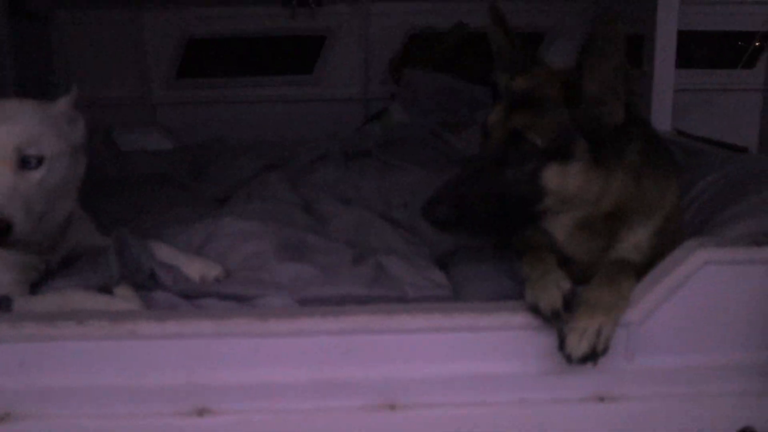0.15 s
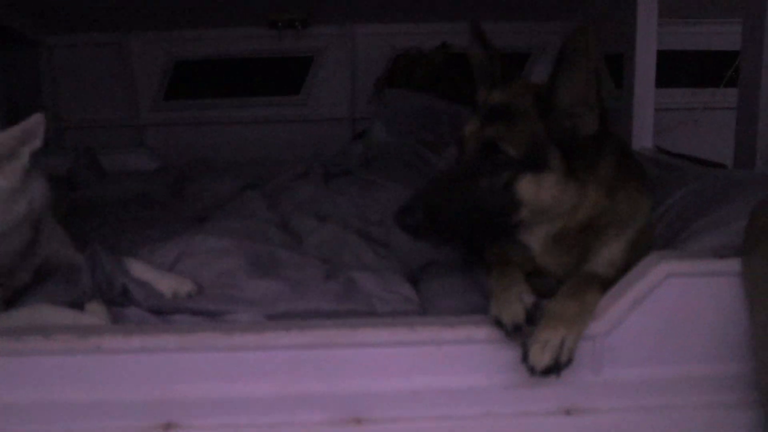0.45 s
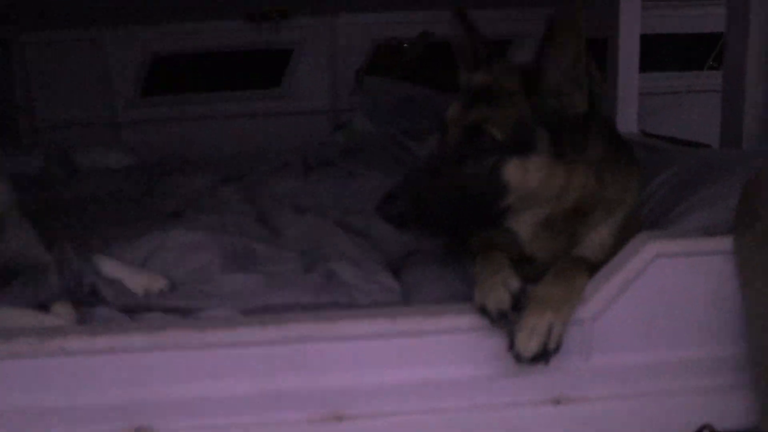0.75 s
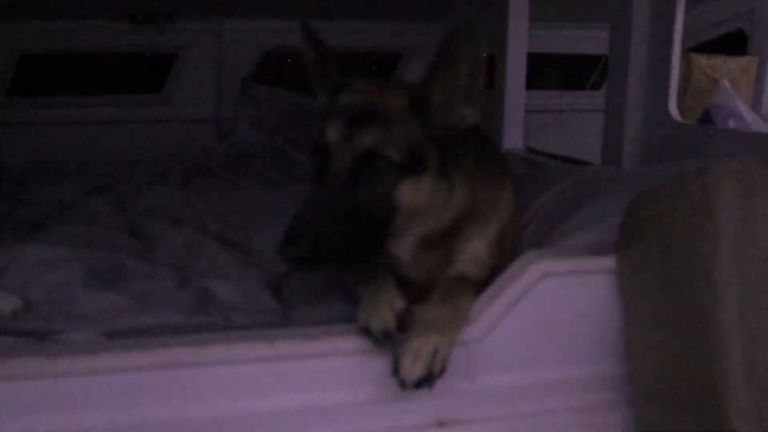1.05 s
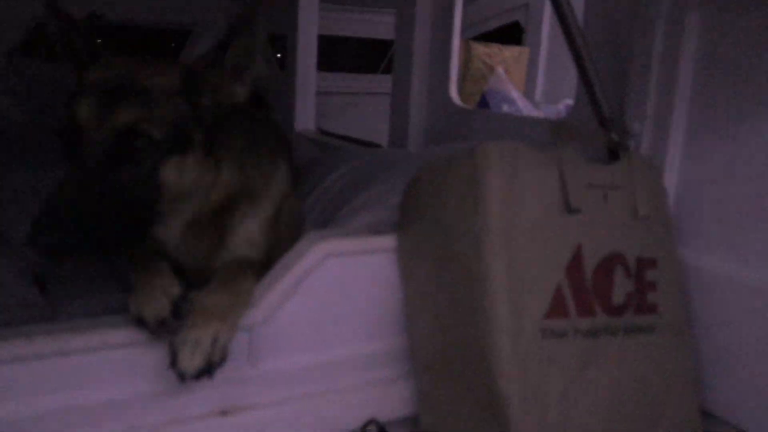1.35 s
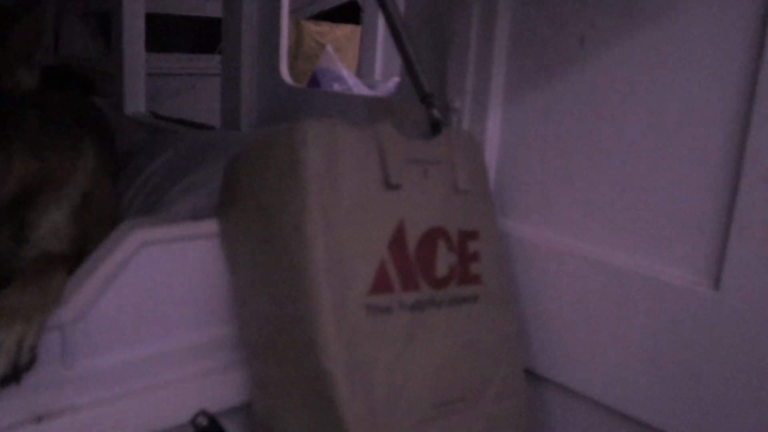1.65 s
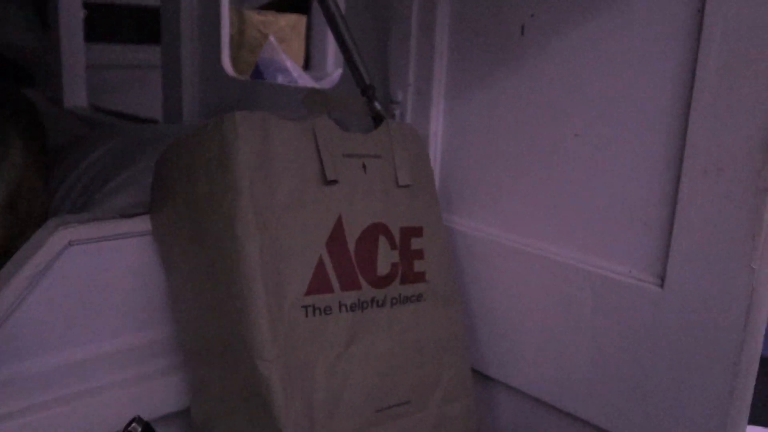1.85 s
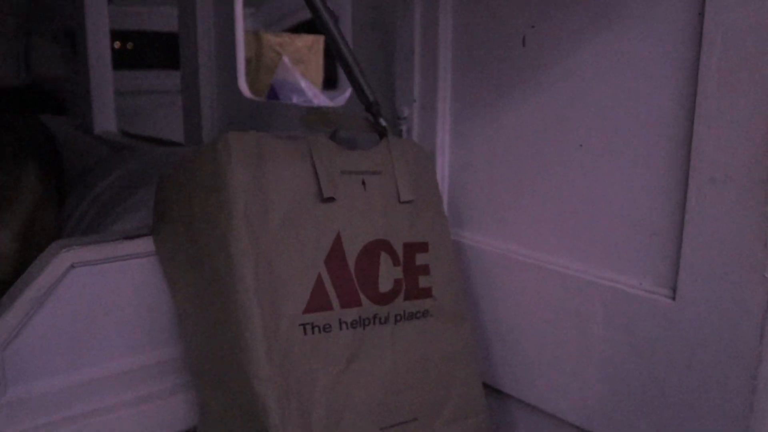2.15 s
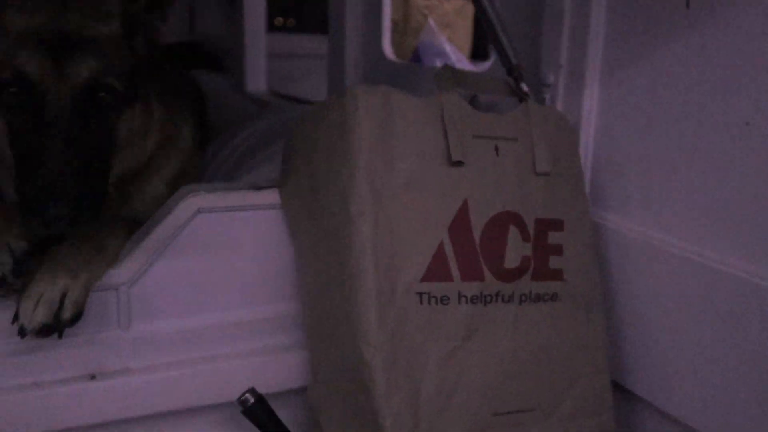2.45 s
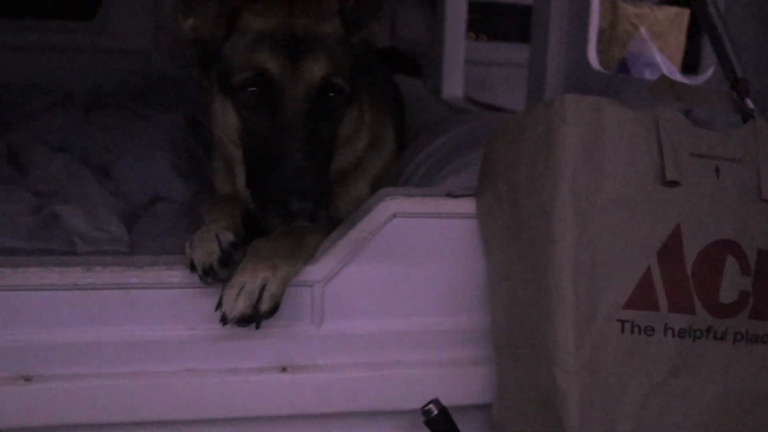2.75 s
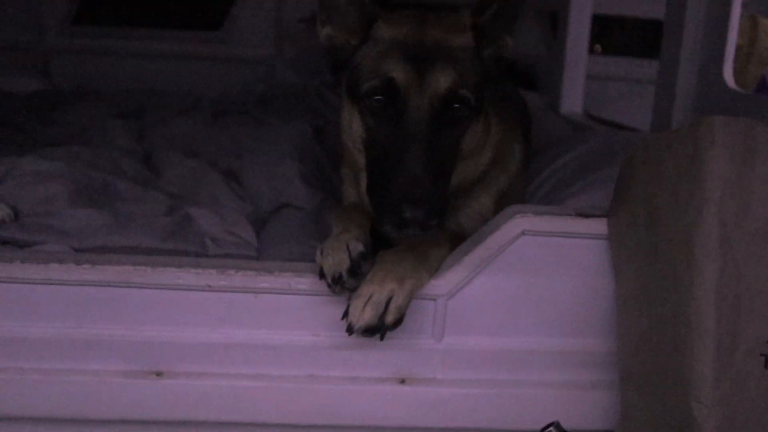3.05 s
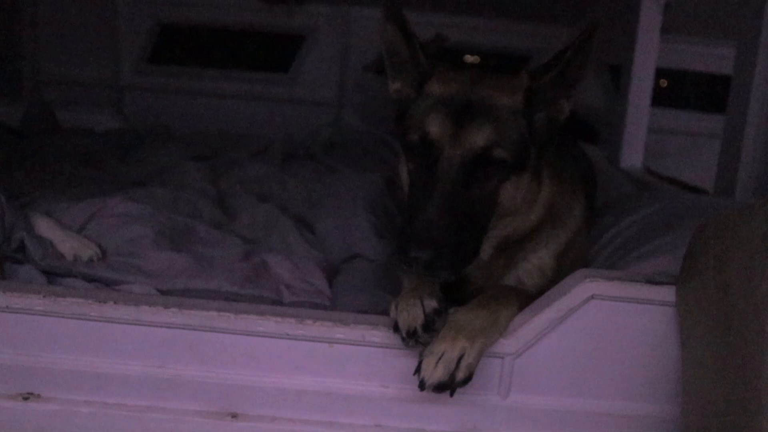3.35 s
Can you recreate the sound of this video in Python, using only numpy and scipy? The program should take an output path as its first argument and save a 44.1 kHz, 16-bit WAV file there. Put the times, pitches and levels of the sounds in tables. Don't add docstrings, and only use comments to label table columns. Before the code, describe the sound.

Strong wind around a moored boat, heard in the cabin: a whistle fades into a roaring gust with sharp canvas slaps, a moaning lull, then two more gusts with slaps and knocks, through a small stereo microphone.

```python
import sys
import numpy as np
from scipy import signal
from scipy.fft import rfft, irfft
from scipy.io import wavfile
from scipy.ndimage import uniform_filter1d, minimum_filter1d

SR = 44100
rng = np.random.default_rng(int(sys.argv[2]) if len(sys.argv) > 2 else 0)


def generate_wav(signal):
    frames = np.transpose(np.atleast_2d(signal))
    scaled = np.clip(frames, -1, 1) * 32767
    pcm = np.round(scaled).astype(np.int16)
    wavfile.write(sys.argv[1], SR, pcm)


def volts_from_decibels(level):
    exponent = np.asarray(level, float) / 20
    return 10 ** exponent


N = 154350
CENTRE_TOP_HZ = 8220


def read(points, hz):
    p = np.array(points, float)
    return np.interp(np.log(np.maximum(hz, 1)), np.log(p[:, 0]), p[:, 1])


def shape(x, gain):
    n = x.shape[-1]
    return irfft(rfft(x) * gain(np.arange(n // 2 + 1) * SR / n), n)


def unit(x):
    return x / np.sqrt(np.mean(x ** 2))


def peak(hz, width_hz):
    return lambda f: 1 / (1 + ((f - hz ** 2 / np.maximum(f, 1)) / width_hz) ** 2)


def walk(rate_hz):
    k = int(SR / rate_hz)
    held = np.repeat(rng.standard_normal(N // k + 1), k)
    return 1.14 * uniform_filter1d(uniform_filter1d(held, k), k)[:N]


def noise(gain, size=N):
    return unit(shape(rng.standard_normal((2, size)), gain))


def burst(length_s, size, rise_s=0.003, tail_db=-12):
    t = np.arange(size) / SR
    held = np.repeat(rng.standard_normal(size // 128), 128)
    grain = volts_from_decibels(2.5 * uniform_filter1d(held, 64))
    release_s, sag_s, tail_s = 0.011, 0.045, 0.05
    after = np.maximum(t - length_s, 0)
    body = grain * np.exp(-after / release_s - t / sag_s)
    return np.minimum(t / rise_s, 1) * (body + volts_from_decibels(tail_db) * np.exp(-t / tail_s))


def add(out, s, x):
    i = int(s * SR)
    out[:, i:i + x.shape[1]] += x[:, :N - i]


# time in seconds, then hull rumble, moan, rush and spray hiss, all in dB.
GUST_LEVELS = [(0.0, -31, -34, -33, -53), (.2, -26.5, -28, -28.5, -48), (0.37, -19.5, -26, -24.5, -48),
               (.5, -27.5, -31.5, -28.5, -54.5), (0.62, -30, -26, -33, -54),
               (.78, -31.5, -25.5, -35.5, -57.5), (0.96, -34, -24, -34.5, -53),
               (1.15, -29, -24.5, -32.5, -50.5), (1.38, -20.5, -26.5, -27, -50),
               (1.72, -27, -25, -33.5, -53.5), (2.02, -24, -21.5, -31.5, -53), (2.2, -22, -24, -27, -47),
               (2.4, -19, -22, -26.5, -47), (2.6, -27, -21.5, -31, -52), (2.9, -26, -22, -32, -53),
               (3.15, -27.5, -21, -34, -54), (3.5, -27.5, -24, -34, -51.5)]


def gust(column):
    g = np.array(GUST_LEVELS)
    return volts_from_decibels(np.interp(np.arange(N) / SR, g[:, 0], g[:, column]))


# frequency in Hz, density in dB per Hz.
HULL_SPECTRUM = [(25, -10.5), (50, -3.5), (75, -3.5), (102, 2), (120, -8), (140, -0.5), (170, -3.5),
                 (300, -22.5)]


def hull_rumble():
    rumble = noise(lambda f: volts_from_decibels(read(HULL_SPECTRUM, f)) * (f < 400) * (f > 15))
    return gust(column=1) * volts_from_decibels(2.2 * walk(7.87) - 0.5) * rumble


# centre in seconds, level in dB, pitch in Hz,
# length in seconds.
PANEL_BOOMS = [(.16, -25, 97.4, 0.15), (.32, -20.5, 118, 0.12), (.37, -21.5, 54.4, 0.12),
               (1.31, -22, 205, 0.096), (1.391, -30, 57, 0.13), (1.47, -25, 137.3, 0.47),
               (2.371, -18, 93, 0.09), (2.44, -17, 142.5, 0.15), (0.825, -26, 325, 0.088),
               (1.01, -25.5, 347, 0.083), (1.097, -23, 340, 0.098), (1.049, -31, 89, 0.14),
               (2.2, -31, 106, .2), (3.139, -28, 70.4, 0.14), (3.351, -30, 49.7, .15)]


def panel_booms():
    t, out = np.arange(N) / SR, 0
    for s, db, hz, length_s in PANEL_BOOMS:
        swell = np.cos(np.pi * np.clip((t - s) / length_s, -0.5, 0.5)) ** 2
        out = out + volts_from_decibels(db) * swell * np.sin(2 * np.pi * hz * (t - s)) * np.sqrt(2)
    return out


# frequency in Hz, density in dB per Hz.
RUSH_SPECTRUM = [(150, -13.5), (200, -0.5), (340, -3.5), (520, -6.5), (900, -13), (1800, -20), (3500, -32),
                 (6500, -59)]


def rush():
    f = np.arange(N // 2 + 1) * SR / N
    spec = rfft(rng.standard_normal((2, N)))
    spec = spec * volts_from_decibels(read(RUSH_SPECTRUM, f)) * (f > 120) / (1 + (f / 8000) ** 8)
    middle = spec[:, (f > 600) & (f < 3000)]
    spec = spec / np.sqrt(np.mean(np.abs(middle) ** 2) * 4800 / SR / N)
    out, flutter = 0, walk(9.41)
    for k in range(13):
        place = 2 * np.log2(np.maximum(f, 1) / 170) - k
        band = irfft(spec * np.cos(np.clip(place, -1, 1) * np.pi / 2) ** 2, N)
        out = out + band * volts_from_decibels(1.2 * flutter + 2.1 * walk(17))
    return volts_from_decibels(-0.5) * gust(column=3) * out


# frequency in Hz, density in dB per Hz.
CANVAS_SPECTRUM = [(600, -46), (1000, -0.5), (2600, 0), (3900, -7.5), (4600, -20.5), (6000, -21),
                   (7500, -40), (9000, -60)]
# frequency in Hz, level in dB.
DECK_MODES = [(1041, -6), (1550, 0), (1740, 3), (2300, -1), (2610, -10.5), (3000, -1), (3370, -6),
              (3800, -20.5), (4430, -28.5)]
# start in seconds, peak in dB, ring in Hz, length in seconds, low thud in dB.
CANVAS_SLAPS = [(0.229, -38, 1630, 0.0071, -12), (0.305, -30, 2500, .015, -5),
                (0.332, -22.5, 1720, .01, 10), (0.346, -14.5, 1970, 0.024, -4),
                (0.381, -28, 1400, 0.011, 5), (0.406, -25.5, 2280, 0.027, -3), (0.449, -29, 1210, .008, 9),
                (0.462, -14, 2580, 0.022, -4.5), (0.502, -26, 1900, .015, -1),
                (0.59, -30.5, 1610, 0.0065, 0), (0.607, -22.5, 2210, 0.035, 0.5),
                (1.191, -36, 1490, 0.021, -1), (1.306, -30.5, 1430, 0.043, -7), (1.41, -27, 3270, .006, -5),
                (1.4174, -17, 2820, 0.044, 0), (1.474, -24, 3350, 0.015, 0.5), (1.505, -33, 2400, 0.013, 2),
                (1.873, -24.5, 1410, 0.028, -6), (2.176, -30.5, 1620, 0.017, 13),
                (2.367, -22.5, 4480, 0.0086, -5), (2.401, -16, 1790, 0.016, -0.5),
                (2.425, -25, 1510, 0.0082, 3), (2.446, -24.5, 3920, 0.011, 0),
                (2.486, -24, 2800, 0.014, -10), (2.508, -25, 3360, .008, -5),
                (2.5182, -15.5, 1420, 0.02, -5), (2.545, -25.5, 1500, .02, 3)]


def slaps(size=16384):
    out = np.zeros((2, N))
    for s, db, ring_hz, length_s, thud_db in CANVAS_SLAPS:
        cloth = noise(lambda f: volts_from_decibels(read(CANVAS_SPECTRUM, f)) * (f > 700) * (f < 9500), size=size)
        struck = volts_from_decibels(5 * rng.standard_normal(len(DECK_MODES)))

        def deck_gain(f):
            return sum(g * volts_from_decibels(mode_db) * peak(hz, 380)(f) for g, (hz, mode_db) in zip(struck, DECK_MODES))

        deck = volts_from_decibels(-1.5) * noise(deck_gain, size=size)
        ring = volts_from_decibels(-5) * noise(peak(ring_hz, 110), size=size)
        thud = volts_from_decibels(-5 + thud_db) * noise(peak(744, 580), size=size)
        x = volts_from_decibels(-7.5) * (cloth + deck + ring) + thud
        add(out, s, volts_from_decibels(db) * x * burst(length_s, size, rise_s=0.004))
    return out


# start in seconds, peak in dB, length in seconds, top in dB, body in dB.
ROPE_TICKS = [(0.18, -42, 0.012, -6, 15), (0.3104, -37, 0.021, 0, 12.5), (0.465, -24, 0.015, -38, 6.5),
              (0.588, -48.5, 0.015, -2.5, 9), (0.919, -41, 0.018, -13, 4), (1.244, -40, 0.027, -6.5, 10.5),
              (1.56, -37.5, 0.0099, -18, 12.5), (1.684, -44, 0.053, -30, 8),
              (1.735, -35.5, 0.0067, -12, 10.5), (2.074, -51, 0.051, -7, 16), (2.113, -38.5, 0.029, -15, 0),
              (2.2, -40.5, .12, -10, 9), (2.513, -30.5, 0.015, -34, -10), (2.756, -42, 0.013, -9.5, -11),
              (3.128, -43.5, 0.027, -6, 12)]


def ticks(size=16384):
    out = np.zeros((2, N))
    for s, db, length_s, top_db, body_db in ROPE_TICKS:
        click = noise(lambda f: peak(4470, 3000)(f) * (f < CENTRE_TOP_HZ), size=size)
        body = volts_from_decibels(body_db) * noise(peak(1800, 1900), size=size)
        top = volts_from_decibels(top_db) * noise(lambda f: peak(9800, 4000)(f) / (1 + (f / 13000) ** 16), size=size)
        add(out, s, volts_from_decibels(db - 9.5) * (click + body + top) * burst(length_s, size, tail_db=-3.5))
    return out


# frequency in Hz, width in Hz, level in dB.
MOAN_BANDS = [(303, 82, -2), (330.6, 43, -0.5), (371, 87, -5), (580, 340, -10)]


def moan():
    bands = [volts_from_decibels(db + 0.82 * walk(5.2)) * noise(peak(hz, width_hz)) for hz, width_hz, db in MOAN_BANDS]
    return volts_from_decibels(-2.0) * gust(column=2) * unit(sum(bands))


# start and end in seconds, first and last pitch in Hz, level in dB.
RIGGING_WHISTLES = [(-.1, 0.085, 456, 467, -21.5), (0.802, 1.3, 395.8, 446, -32.5),
                    (1.021, 1.18, 429, 540, -34), (1.1, 1.3, 532, 544, -36.5),
                    (2.543, 3.343, 414.4, 424.3, -27.5), (3.28, 3.595, 401, 389.5, -32),
                    (0.854, 1.464, 1508, 1562, -48), (0.991, 1.95, 3450, 3490, -57),
                    (2.945, 3.154, 763, 754, -37.5)]


def whistles():
    t, out = np.arange(N) / SR, 0
    for a, b, first_hz, last_hz, db in RIGGING_WHISTLES:
        pitch_hz = np.interp(t, [a, b], [first_hz, last_hz]) * (1 + 0.012 * walk(7.2))
        phase = 2 * np.pi * np.cumsum(pitch_hz) / SR
        width_hz = 0.061 * first_hz
        slow = lambda: noise(lambda f: 1 / (1 + (2 * f / width_hz) ** 2))
        steady = 2 * 0.6
        tone = (slow() + steady) * np.cos(phase) + slow() * np.sin(phase)
        fade_s = min(0.15, (b - a) / 2)
        out = out + volts_from_decibels(db) * np.clip(np.minimum(t - a, b - t) / fade_s, 0, 1) * tone
    return out


# start in seconds, level in dB, ring in Hz, length in seconds.
GEAR_KNOCKS = [(0.14, -36, 714, 0.005), (0.229, -30, 1560, 0.0064), (0.7275, -43, 3900, 0.015),
               (.143, -45.5, 4600, 0.013), (2.32, -38, 2800, .02), (1.548, -24, 700, 0.022),
               (1.5, -27.5, 730, 0.0079), (2.085, -25, 690, 0.012), (2.404, -30, 1720, 0.023),
               (2.487, -24.5, 2820, 0.0086), (2.369, -42, 3600, .006), (2.52, -37, 5700, .006),
               (1.3, -40.5, 4840, .03), (1.7035, -36.5, 3040, .01), (2.875, -51, 5500, 0.0081),
               (3.4, -36, 1800, .008), (3, -38, 1530, .008)]


def knocks(size=8192):
    out, t = np.zeros((2, N)), np.arange(size) / SR
    for s, db, hz, length_s in GEAR_KNOCKS:
        ring = 0.45 * np.sin(2 * np.pi * hz * t) + noise(peak(hz, 0.3 * hz), size=size)
        add(out, s, volts_from_decibels(db) * ring * burst(length_s, size, tail_db=-14.5))
    return out


# frequency in Hz, density in dB per Hz.
SPRAY_SPECTRUM = [(3500, 1), (5000, -4), (7000, -10.5), (9000, -17.5), (11000, -11), (12500, -19.5),
                  (14500, -32)]


def spray():
    hiss = noise(lambda f: volts_from_decibels(read(SPRAY_SPECTRUM, f)) / (1 + (3000 / (f + 1)) ** 4))
    return gust(column=4) * volts_from_decibels(0.5 + 0.9 * walk(10.53)) * hiss


# frequency in Hz, side minus mid in dB.
SIDE_LEVELS = [(60, -48), (110, -40), (200, -20.5), (370, -10.5), (680, -5.5), (1250, -1), (2290, 2.5),
               (4210, 5.5), (7730, 9.5), (14200, 5)]


def capsules(x, share):
    lean = shape(x[0], lambda f: -share(f) * volts_from_decibels(read(SIDE_LEVELS, f)))
    apart = shape(x[1], lambda f: np.sqrt(1 - share(f) ** 2) * volts_from_decibels(read(SIDE_LEVELS, f)))
    return np.array([x[0], lean + apart])


# frequency in Hz, share of mid in side from 0 to 1.
WIND_SHARE = [(100, 0.2), (400, 0.55), (1000, 0.23), (2500, 0.36), (8000, 0.15)]


def scene():
    wind = hull_rumble() + panel_booms() + rush() + spray() + moan() + whistles()
    blows = slaps() + ticks() + knocks()
    wind = capsules(wind, lambda f: np.clip(read(WIND_SHARE, f), 0, 0.99))
    mid, side = wind + capsules(blows, lambda f: 0.4)
    return np.array([mid + side, mid - side])


def band_limit(x):
    return signal.sosfilt(signal.butter(12, 14780, fs=SR, output="sos"), x)


def record(dry):
    left, right = shape(dry, lambda f: 1 / (1 + (f / 13800) ** 16))
    mid, side = (left + right) / 2, (left - right) / 2
    top = shape(mid, lambda f: f > CENTRE_TOP_HZ)
    side_top = side - shape(side, lambda f: f < CENTRE_TOP_HZ)
    presence = shape(mid, lambda f: (f > 1500) * (f < 5000))
    band_db = lambda x: 10 * np.log10(uniform_filter1d(x ** 2, size=2048) + 1e-12)
    lead_db = band_db(presence) - band_db(side_top)
    mid = mid - top + top * volts_from_decibels(-1.6 * np.maximum(lead_db - 20, 0))
    ceiling, fade_s = 0.8, 0.003
    room = np.minimum(ceiling / (np.abs(mid) + np.abs(side) + 1e-9), 1)
    limit = uniform_filter1d(minimum_filter1d(room, size=256), size=256)
    i = np.arange(N)
    limit = limit * np.minimum(np.minimum(N - i, i) / SR / fade_s, 1)
    return band_limit(limit * np.array([mid + side, mid - side]))


dry = scene()
out = record(dry)
generate_wav(out)
```